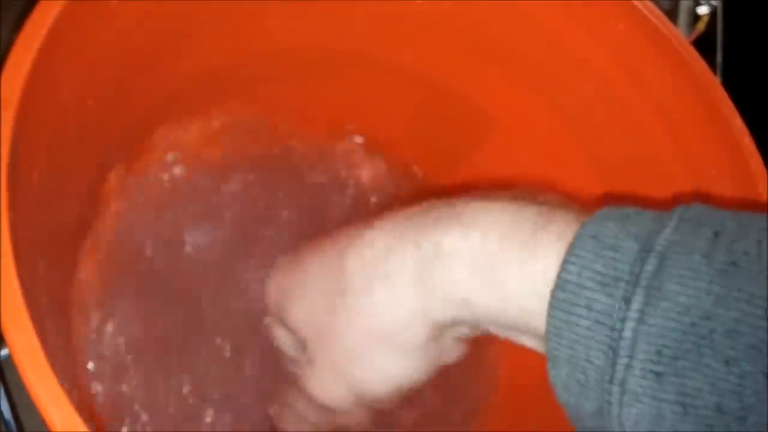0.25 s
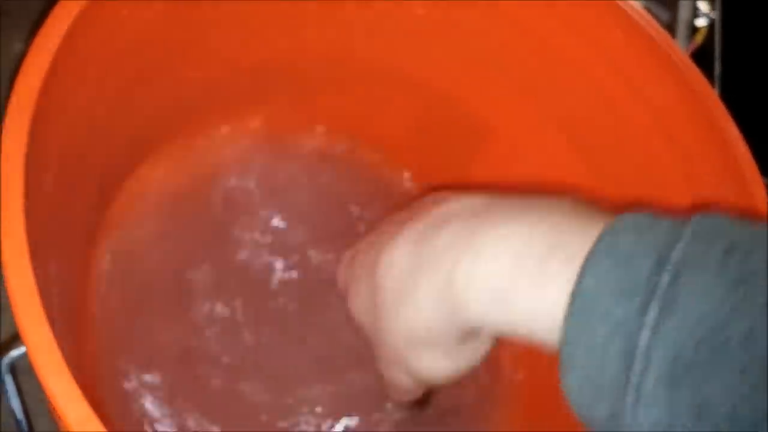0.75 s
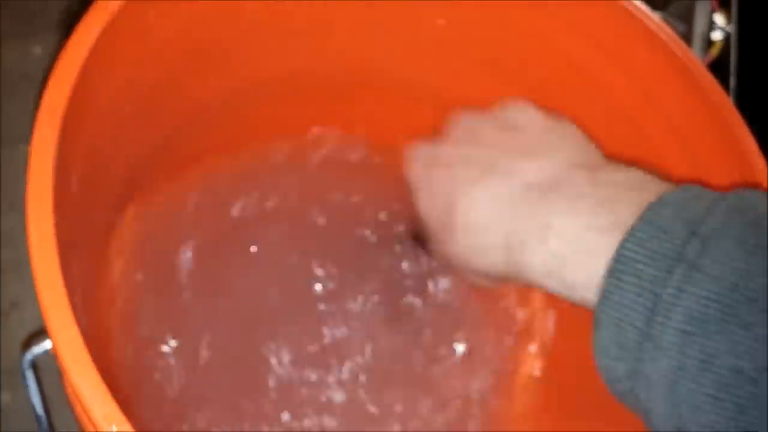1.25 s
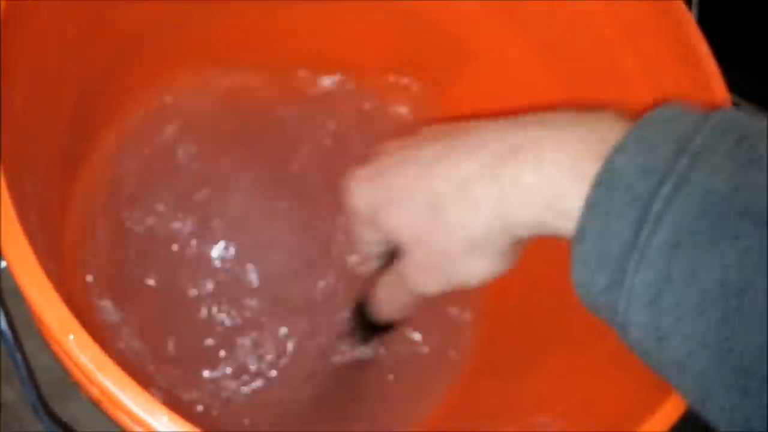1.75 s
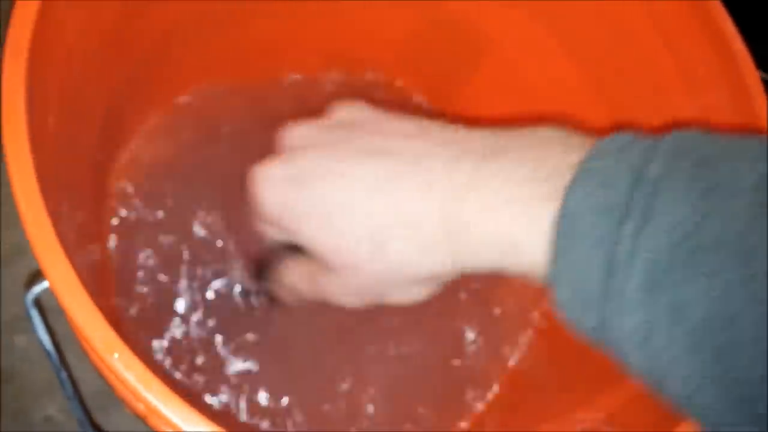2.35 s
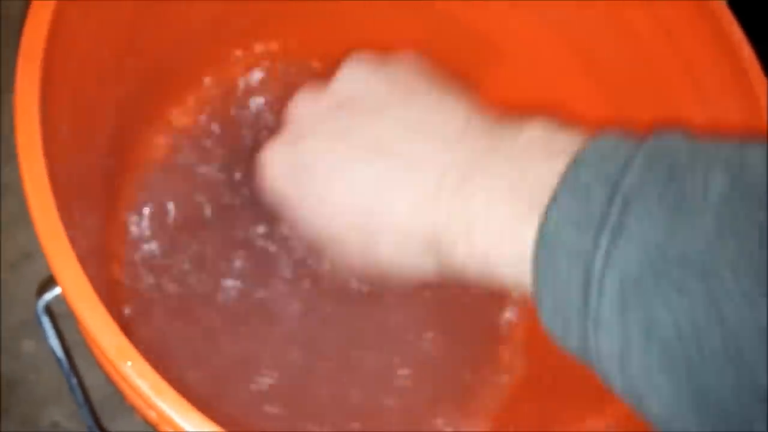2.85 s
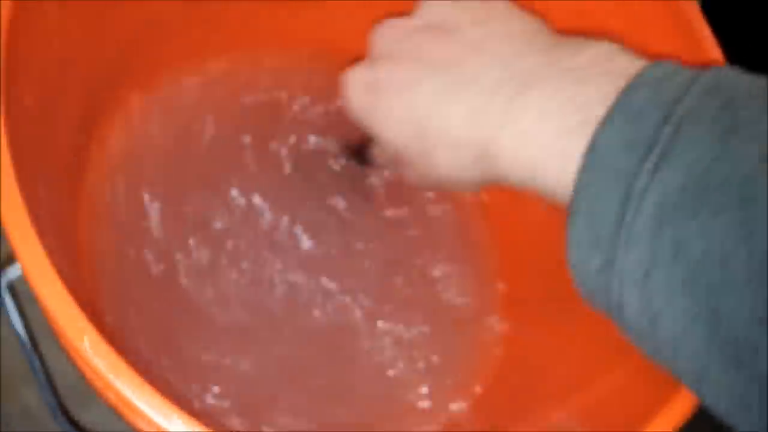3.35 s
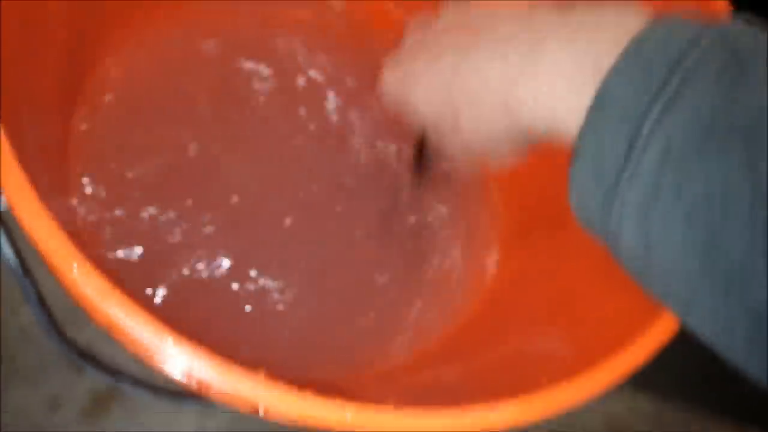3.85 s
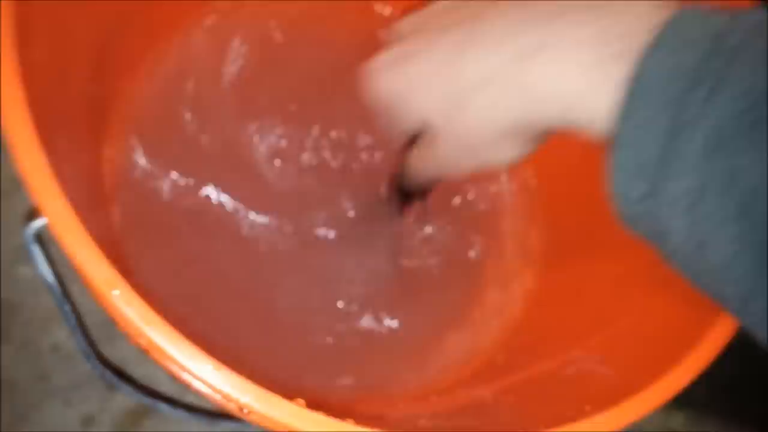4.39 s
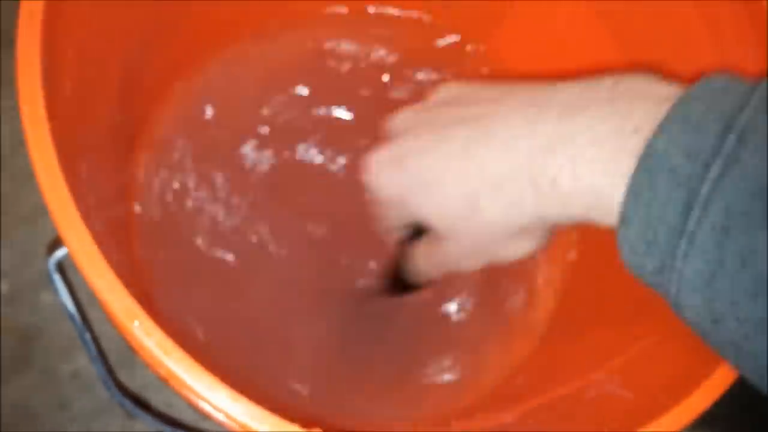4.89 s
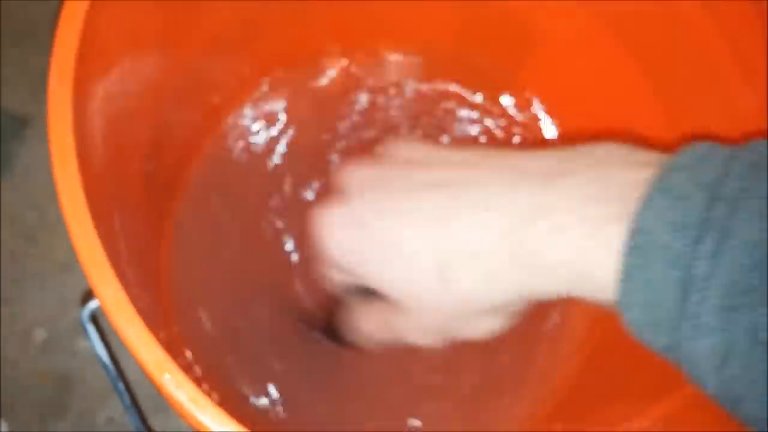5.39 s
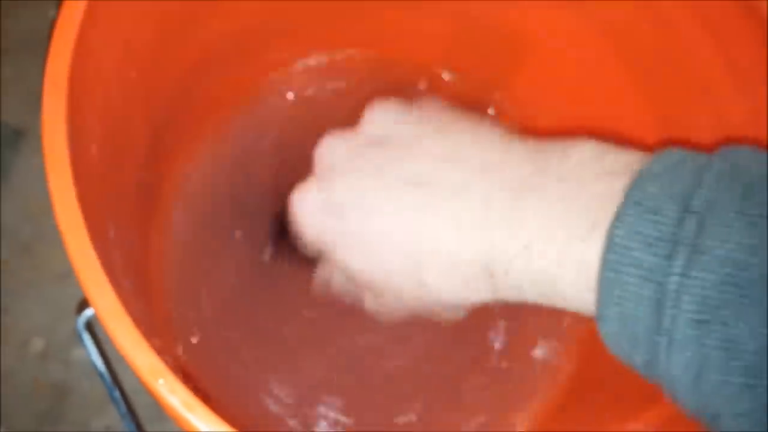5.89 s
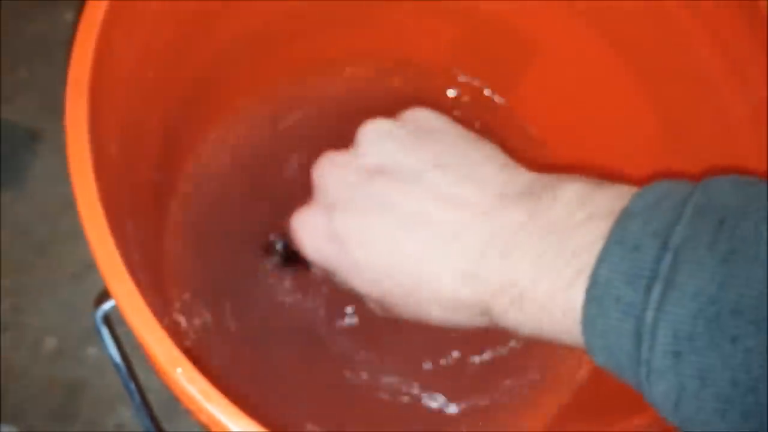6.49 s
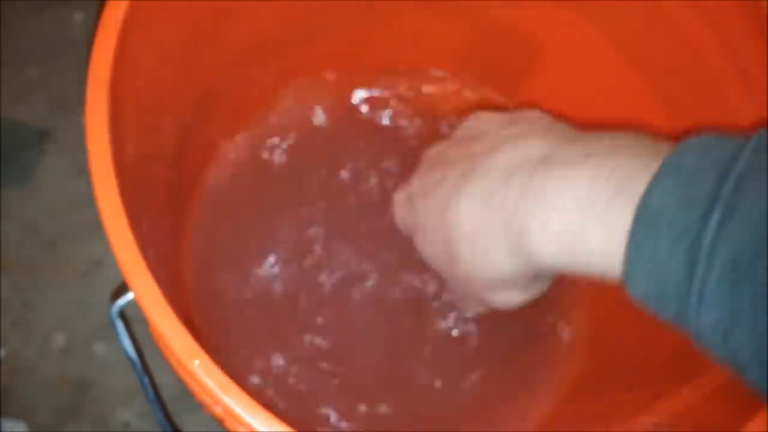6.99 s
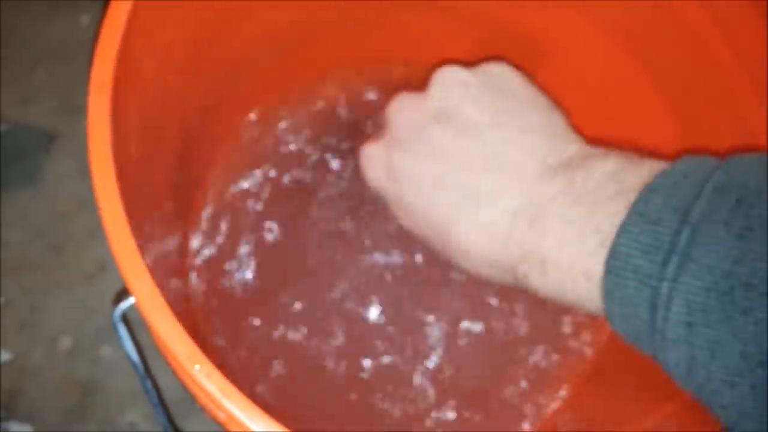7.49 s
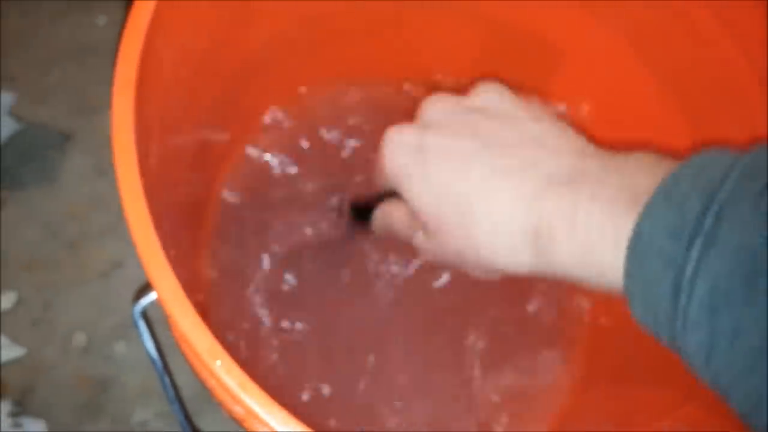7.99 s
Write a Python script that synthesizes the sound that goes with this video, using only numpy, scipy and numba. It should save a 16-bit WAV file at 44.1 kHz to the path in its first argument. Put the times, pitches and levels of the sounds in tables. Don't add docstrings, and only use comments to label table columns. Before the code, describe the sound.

Water is stirred by hand in a plastic bucket, heard very close in stereo with a hollow, boxy resonance and short wall echoes. From 0 s the sloshing is busy: deep glugs, round plops, bubbles rising slightly in pitch, crisp droplets and hissing spray. A low machine hum swells at 0.5-1 s, drops, returns faintly and vanishes by 2.4 s, leaving only weak room rumble. Plops and splashes continue in irregular surges through 2-3.4 s. A sharp bright click from a finger on the microphone body lands left at 3.5 s; a duller tap with a low thump follows at 4.3 s. Around 5-6 s the water becomes sparser and more trickling, with short dips, and almost hushes at 6.05-6.25 s. Quick bubbly plops restart at 6.35 s, then strong swirling, heavy glugs near 7 s, bright drips and spray carry on until the end at about 8.2 s.

```python
import sys
import numpy as np
from scipy import signal
from scipy.fft import rfft, irfft, next_fast_len
from scipy.io import wavfile
from scipy.ndimage import uniform_filter1d, map_coordinates
from numba import njit

SR = 44100
rng = np.random.default_rng(int(sys.argv[2]) if len(sys.argv) > 2 else 0)


def transcribe(signal):
    frames = np.atleast_2d(signal).T
    limited = np.clip(frames, -1, 1)
    pcm = np.round(limited * 32767).astype(np.int16)
    wavfile.write(sys.argv[1], SR, pcm)


def ratio_of_db(decibels):
    return 10 ** (np.asarray(decibels, float) / 20)


N = 363384

# time in seconds, level in dB.
MACHINE_DRONE = [
    (0.0, -43),
    (0.55, -30.5),
    (0.71, -34),
    (0.77, -32.5),
    (0.93, -29),
    (1.12, -59),
    (1.28, -41),
    (2.25, -51),
    (2.36, -81),
]
# frequency in Hz, level in dB per Hz.
RUMBLE_COLOUR = [(15, -70), (28, -14), (60, 14.5), (95, 14.5), (122, 17.5), (165, -8.5), (230, -11),
                 (440, -120)]
# time in seconds, click in dB, thump in dB, click brightness in Hz.
CAMERA_TAPS = [
    (3.5171, -2.5, -73, 14700),
    (4.3149, -6, -13, 3280),
]
# start in seconds, end in seconds, depth in dB.
GATE_CLOSINGS = [(2.358, 2.385, -3), (0.876, 0.96, -2.5), (3.35, 3.443, -5.5), (3.74, 3.818, -5),
                 (5.144, 5.167, -7.5), (6.732, 6.799, -7.5), (4.321, 4.414, -10), (4.814, 4.862, -8),
                 (4.935, 4.983, -8), (5.442, 5.496, -12.5), (6.051, 6.121, -18.5), (6.125, 6.163, -24),
                 (6.227, 6.256, -14)]
# frequency in Hz, width in Hz, level in dB.
AIR_COLUMN = [
    (213, 11, -4),
    (176, 14, -14),
    (282, 44, 0),
    (517, 45, -26),
    (762, 44, -1),
    (1255, 110, -3),
    (1600, 200, -5),
    (2100, 300, -9),
    (3430, 700, -12),
    (5890, 1500, -12),
]
# frequency in Hz, level in dB per Hz.
SPRAY_COLOUR = [(1410, -3), (2400, 3), (2730, 2), (3530, -6), (4250, -5.5), (5950, -1), (11000, -14),
                (15100, -21), (16400, -79)]
# time in seconds, stirring effort in dB, froth (how far fingers break the surface) in dB.
HAND = [(0.0, -20.5, -1.5), (0.96, -35, 3.5), (1.17, -20.5, 3), (1.46, -31, 3.5), (1.67, -32, -1),
        (1.86, -23, 0.5), (2.44, -29.5, 4), (2.66, -29, 4), (3.36, -31, 2), (4.64, -32, 0.5),
        (4.86, -33.5, 12.5), (5.16, -27.5, 5.5), (5.38, -36, 9), (5.8, -31.5, 5), (6.1, -38, 7),
        (6.29, -63, 30), (6.5, -23.5, -3.5), (8.24, -28.5, 7.5)]
# start in seconds, effort at the crest in dB, length in seconds.
WALL_WAVES = [
    (0.649, -20, 0.15),
    (2.538, -24.5, 0.33),
    (3.427, -25.5, 0.07),
    (3.8, -25.5, 0.25),
    (4.417, -23.5, 0.3),
    (5.584, -26, 0.26),
    (6.544, -22.5, 0.14),
    (6.796, -30, 0.73),
    (7.638, -24.5, 0.3),
]
# time in seconds, how far the trickle outweighs the spray in dB.
FINGER_DEPTH = [(0, -3.5), (1, 0), (2, 0), (3, -1), (3.6, -1), (3.9, 3.5), (4.3, 2.5), (5, 7), (5.9, 7),
                (6.6, 1), (7.3, 2.5), (8.24, 2.1)]
# dB over the effort, how steeply it follows effort, share of froth,
# wake level under its event in dB, time for the wake to fall 60 dB in seconds.
GLUG_LAYER = (-11, 2.5, -0.26, -9, .5)
BUBBLE_LAYER = (-0.5, 1.5143, 0.13, -12.5, 0.28)
TRICKLE_LAYER = (-13.5, 1.53, 0.23, -32, 0.26)
SPRAY_LAYER = (-12.5, 1.17, 1.0767, -31.5, 0.43)
# time in seconds, peak in dB, pitch in Hz.
SPLASH_TICKS = [(0.0136, -11, 2430), (0.0403, -7.5, 5150), (0.0723, -15, 6050), (0.2244, -16, 4900),
                (0.2927, -11, 5100), (0.3626, -13, 3950), (0.5703, -28, 2330), (0.6599, -28, 2990),
                (0.6802, -15, 2930), (1.0156, -18, 3150), (1.0763, -18, 5200), (1.1633, -8.5, 5200),
                (1.2305, -20, 5400), (1.488, -32, 4850), (1.5374, -18, 6230), (1.7534, -13.5, 2490),
                (1.9365, -15.5, 5030), (1.9614, -15, 5540), (1.9964, -19, 5700), (2.0647, -18.5, 5900),
                (2.1055, -13.5, 5600), (2.1385, -17, 4540), (2.251, -21, 4600), (2.3248, -17, 2700),
                (2.338, -13, 5600), (2.4354, -22, 5900), (2.5707, -13, 5930), (2.6025, -6.5, 5800),
                (2.6344, -14.5, 4320), (2.6574, -9.5, 5500), (2.6857, -17, 4430), (2.707, -24, 2880),
                (2.769, -18, 2770), (2.9492, -22, 3270), (3.8023, -25, 2830), (3.9293, -18.5, 3040),
                (4.016, -29, 3070), (4.0495, -18.5, 3380), (4.2198, -16.5, 2800), (4.4238, -19, 2730),
                (4.531, -15, 3120), (4.7765, -21, 3740), (4.9916, -21, 3900), (5.174, -27.5, 3560),
                (5.3331, -19.5, 3070), (5.4221, -25, 5160), (5.6003, -32, 3360), (5.7085, -17, 3160),
                (6.6124, -9, 2660), (6.8748, -21.5, 3650), (6.893, -17, 3630), (6.952, -16, 3010),
                (7.088, -13.5, 3250), (7.207, -13.5, 2950), (7.284, -15, 3440), (7.5682, -19, 3200),
                (7.5887, -17.5, 4150), (7.6872, -13, 3230), (7.772, -15.5, 3450), (8.099, -20, 2990),
                (0.309, -17, 5070), (1.106, -22, 4600), (1.2944, -14, 4900), (2.2179, -27, 4770),
                 (2.882, -27, 6500), (4.4944, -14, 6670), (4.016, -24, 7200), (4.1, -30, 6400),
                 (4.18, -25, 5370), (4.219, -31, 7000), (4.908, -32, 6640), (6.7141, -21.5, 6520),
                 (6.7466, -20, 6940), (7.0627, -14.5, 6760), (7.1891, -18, 5920), (7.2893, -13, 6200),
                 (7.3914, -12, 6870)]
# time in seconds, peak in dB, pitch in Hz.
SMALL_LAPS = [(0.248, -16, 1335), (0.292, -3.5, 1410), (0.331, -15, 1250), (0.52, -13.5, 2020),
              (0.542, -13, 1270), (1.104, -14.5, 1550), (1.639, -19, 716), (1.705, -14, 1800),
              (1.718, -11, 1580), (2.011, -7, 1200), (2.063, -27, 870), (2.083, -28, 820),
              (2.095, -16, 775), (2.137, -11.5, 1280), (2.39, -17, 1520), (2.71, -5, 1200),
              (2.741, -19, 810), (2.772, -16, 800), (2.803, -15.5, 1270), (2.958, -15.5, 1420),
              (3.154, -19, 1480), (3.609, -15.5, 1580), (3.808, -16, 810), (3.947, -10.5, 1320),
              (4.408, -20, 825), (4.424, -11, 1530), (4.465, -11, 1520), (4.483, -18.5, 844),
              (4.886, -22, 1540), (5.013, -13, 1460), (5.037, -18, 930), (5.143, -17.5, 800),
              (5.213, -20, 1280), (5.33, -17.5, 1490), (5.577, -18.5, 880), (5.655, -28.5, 1340),
              (6.456, -12.5, 1035), (6.532, -13.5, 1900), (6.829, -14, 1610), (6.901, -12, 805),
              (7.145, -14, 1370), (7.204, -21, 1040), (7.276, -12, 805), (7.583, -19, 1230),
              (7.667, -25, 1340), (7.686, -13, 1130), (7.889, -16, 745), (8.075, -17, 1860)]
# time in seconds, peak in dB, pitch in Hz.
HOLLOW_GULPS = [(0.019, -18, 400), (0.509, -25, 386), (0.66, -15.5, 595), (1.143, -13, 660),
                (1.229, -10.5, 660), (1.752, -17.5, 480), (2.48, -18, 600), (4.559, -19, 376),
                (6.574, -8, 520), (7.399, -17, 570), (7.739, -15.5, 550)]
# time in seconds, peak in dB, pitch in Hz.
AIR_POCKETS = [(0.029, -11, 334), (0.29, -8, 260.4), (0.524, -17.5, 267), (0.673, -6, 309),
               (1.045, -17, 279), (1.131, -15, 288), (1.163, -8, 283), (1.642, -15, 248),
               (1.751, -19.5, 276), (2.131, -16, 275), (2.493, -22, 265), (2.713, -22, 260),
               (3.118, -24, 405), (3.224, -15.5, 235), (3.463, -16.5, 297), (3.649, -20, 270),
               (5.181, -24, 282), (4.313, -17, 175), (4.485, -18.5, 306), (4.549, -15.5, 286),
               (4.618, -18.5, 256), (5.597, -18, 255), (6.458, -13.5, 293), (6.569, -8, 272),
               (6.951, -18.5, 273), (7.019, -13, 273), (7.034, -1.5, 309), (7.742, -7, 262.4),
               (7.881, -11, 308), (8.191, -13.5, 304)]
# time in seconds, peak in dB, pitch in Hz.
DROPLETS = [(0.179, -0.5, 5000), (0.249, -2, 6700), (0.482, -6.5, 4600), (0.6266, -14, 4730),
            (0.993, -8, 4240), (1.2829, -2.5, 4880), (1.317, -6, 4570), (1.39, -4, 4740), (1.507, 0, 5540),
            (1.646, -9, 5300), (1.664, 0, 5500), (1.875, -3, 5730), (2.482, -4.5, 5340),
            (2.586, -2.5, 5300), (3.047, -4, 5700), (3.4437, -15, 2830), (3.566, -14.5, 2750),
            (4.3886, -1, 2730), (4.448, -6.5, 6140), (4.478, -2.5, 3570), (5.613, -5, 3240),
            (7.0024, -1.5, 3520), (7.033, 1.5, 3460), (7.183, -3, 3150), (7.243, -7, 6300),
            (7.31, -9, 3110), (7.3818, -7.5, 3970), (7.666, -5.5, 3260), (8.146, -4.5, 3700),
            (8.2232, 3, 3460)]
# time in seconds, peak in dB, pitch in Hz.
TRICKLE_RUNS = [(6.007, -23, 3680), (6.213, -25, 4230), (6.224, -29.5, 2350), (6.262, -23.5, 2920),
                (6.278, -25.5, 7300), (6.46, -15, 4920), (6.089, -10.5, 6500), (6.3137, -14.5, 4270)]
# time in seconds, peak in dB, pitch in Hz, life in cycles, pitch rise per life.
LONG_BUBBLES = [(0.838, -24.5, 1518, 29, 0.004), (7.153, -10, 3260, 16, 0.006),
                (1.04, -22, 512, 5.8, 0.034), (1.053, -14.5, 774, 8.6, 0.085),
                (0.668, -6.5, 755, 16, 0.0017), (1.228, -6.5, 603, 6, 0.062), (1.26, -14, 635, 7, 0.03),
                (3.335, -14.5, 765, 14.5, 0.002), (6, -22, 937, 10, 0.0012),
                (6.162, -31.5, 2170, 13, 0.001), (6.567, -4.5, 506, 6.8, 0.037),
                (7.42, -19, 336, 5.1, 0.009), (7.969, -16.5, 568.5, 14, 0.17)]
# time in seconds, peak in dB, pitch in Hz, thrown water in dB under the peak.
LARGE_PLOPS = [(0.073, 3.5, 750, -18), (0.659, -3.5, 734, -19), (0.995, -14.5, 840, 1.5),
               (1.145, -11.5, 718, -22), (1.232, -3, 670, -27), (1.265, -5.5, 708, -37),
               (1.639, -8, 744, -2.5), (1.754, 0, 707, -6), (2.481, -0.5, 735, -4.5),
               (3.121, -11, 728, 3.5), (3.442, -2.5, 757, -6), (3.817, -8, 763, -6), (4.391, -3, 910, -35),
               (6.806, -9.5, 730, -89), (6.874, -10, 876, -32), (7.308, 2.5, 762, -31),
               (7.741, -10.5, 675, 6), (8.114, -8, 830, -1.5)]
MIDDLING_PLOPS = [(0.291, -27, 1395, -23), (0.423, -5.5, 1390, -24), (1.283, -3.5, 1280, -20),
                  (1.304, -8, 1320, -36), (1.39, -9, 1370, -4.5), (1.893, -5, 1390, 4.5),
                  (2.022, -16, 1120, -32), (2.119, -4, 1160, -19), (2.634, -4, 1250, -16),
                  (2.709, -11, 1260, 6), (3.034, -5, 1026, -41), (3.643, -2.5, 1210, -9),
                  (3.931, -17, 1370, 6.5), (4.017, -7, 1160, -11), (4.218, -6, 1324, -21),
                  (4.569, -7.5, 1130, -40), (4.776, -8, 1290, -17), (5.102, -10.5, 1290, -19),
                  (5.17, -1.5, 1230, -18), (5.497, -11, 1260, -34.5), (5.708, -22, 1180, -4),
                  (6.282, -25.5, 1380, -18), (6.676, -7, 1350, -35), (6.949, -7.5, 1110, -4),
                  (6.99, -1.5, 1400, -2.5), (8.173, -8.5, 1120, 6.5), (8.199, -5, 1230, 2)]
SMALL_PLOPS = [(0.032, -2, 2050, -3), (0.335, -2, 1950, -11), (0.363, -4.5, 1880, -3),
               (0.567, -11, 1840, 1.5), (0.834, -12, 1450, -4), (0.963, -22, 2130, -4),
               (1.025, -5, 1730, -2), (1.356, -14.5, 1670, 1.5), (1.488, -12, 1710, -29),
               (1.949, -5, 1970, -7), (2.468, -4, 1970, -31), (2.584, -7, 1630, 5.5),
               (2.987, -8.5, 1990, -63), (3.216, -7.5, 1470, -1), (3.512, -13, 1510, -41),
               (4.531, 4.5, 1410, -40), (4.901, -12.5, 1450, -22), (5.733, -0.5, 1660, -17),
               (5.895, -14.5, 1580, -5.5), (6.35, -6.5, 1830, -11), (6.372, -1, 1730, -34),
               (6.403, -1, 1750, -18), (6.49, 0.5, 1780, -46), (6.557, -6, 1850, -6), (7.035, -11, 1430, 2),
               (7.605, -7, 1480, -3.5), (7.954, -9.5, 1670, -36)]


def unit(x):
    return x / np.sqrt(np.mean(x ** 2) + 1e-20)


def curves(rows):
    s, *columns = np.transpose(rows)
    return [np.interp(np.arange(N) / SR, s, column) for column in columns]


def wobble(rate):
    knots = rng.standard_normal(int(N * rate / SR) + 4)
    return map_coordinates(knots, [np.arange(N) * rate / SR])


def filtered(x, response):
    size = next_fast_len(x.shape[-1] + 8192)
    spectrum = rfft(x, size) * response(np.fft.rfftfreq(size, 1 / SR))
    return irfft(spectrum, size)[..., :x.shape[-1]]


def colour(points):
    f, db = np.transpose(points)
    return lambda hz: ratio_of_db(np.interp(np.log(hz + 1), np.log(f), db))


def workshop():
    t = np.arange(N) / SR
    cycles = 88 * t + np.cumsum(0.92 * wobble(7.1)) / SR
    drone_db = curves(MACHINE_DRONE)[0] - 1.5 + 2.9 * wobble(14)
    drone = np.sin(2 * np.pi * cycles) * ratio_of_db(drone_db)
    mains = ratio_of_db(-54.5 + 1.2 * wobble(6.2)) * np.sin(2 * np.pi * 119 * t)
    air = rng.standard_normal(N) + 0.4 * rng.standard_normal((2, N))
    rumble = ratio_of_db(-51.5 + 0.6 * wobble(3.3)) * unit(filtered(air, colour(RUMBLE_COLOUR)))
    return (drone + mains + rumble) * ratio_of_db([[2.4], [-2.4]])


def taps():
    out, t = np.zeros(N + SR), np.arange(SR // 8) / SR
    for s, click_db, thump_db, bright_hz in CAMERA_TAPS:
        def click_tone(f):
            low_cut = 1j * f / (bright_hz / 5 + 1j * f)
            return 1 / (1 + 1j * f / bright_hz) ** 4 * low_cut

        click = filtered(ratio_of_db(-60 * t / 0.002) * rng.standard_normal(len(t)), click_tone)
        falling_pitch = 75 * t * (1 + np.exp(-t / 0.016))
        thump = ratio_of_db(thump_db - 60 * t / 0.06) * np.cos(2 * np.pi * falling_pitch)
        out[round(s * SR):][:len(t)] += ratio_of_db(click_db) * click / np.abs(click).max() + thump
    return out[:N] * ratio_of_db([[4], [-16]])


def gate():
    db = np.zeros(N)
    for start, end, depth_db in GATE_CLOSINGS:
        db[round(start * SR):round(end * SR)] = depth_db
    return ratio_of_db(uniform_filter1d(db, size=300))


def bucket(f):
    modes = 0
    for k, (centre, width, db) in enumerate(AIR_COLUMN):
        damping = 1j * f * width
        mode = damping / (centre * centre - f * f + damping)
        modes = modes + (-1) ** k * ratio_of_db(db) * mode
    return modes + ratio_of_db(-70.0)


def hollow(f):
    dip = 1 - 0.43 / (1 + ((f - 520) / 130) ** 2)
    return dip / (1 + (120 / (f + 1)) ** 4)


def walls(x):
    t = np.arange(SR // 8) / SR
    tail = rng.standard_normal((2, len(t))) * ratio_of_db(-60 * t / 0.22) * (t > .001)
    echoes = signal.fftconvolve(x, tail / np.linalg.norm(tail[0]), axes=1)[:, :N]
    middle = lambda f: f ** 2 / (f ** 2 + 900 ** 2) / (1 + (f / 4500) ** 2)
    return x + ratio_of_db(-2.5) * filtered(echoes, middle)


def bursts(events, over_db, rise_s, fall_s, sharp, broad_db, pan_db, alike):
    s, db, hz = np.transpose(events)
    t = np.arange(2048) / SR - .008
    f = np.fft.rfftfreq(len(t), 1 / SR) / hz[:, None, None]
    z = rng.standard_normal((len(s), 3, len(t)))
    noise = alike * z[:, :1] + z[:, 1:]
    peak = 1 / (1 + (sharp * (f - 1)) ** 2)
    skirt = ratio_of_db(broad_db) * f / (1 + f ** 2.35)
    tone = irfft(rfft(noise) * (peak + skirt), len(t))
    puff = tone * np.exp(-(t / np.where(t < 0, rise_s, fall_s)) ** 2 / 2)
    puff = puff / np.abs(puff).max(axis=2, keepdims=True)
    puff = puff * ratio_of_db(db[:, None, None] + over_db + pan_db / 2 * np.array([[1], [-1]]))
    at = np.round((s[:, None] + t + rise_s) * SR).astype(int).clip(0, N - 1).ravel()
    return np.array([np.bincount(at, puff[:, ch].ravel(), N) for ch in range(2)])


def ticking():
    events = np.array(SPLASH_TICKS)
    return bursts(events, over_db=-1, rise_s=.0017, fall_s=.0026, sharp=11, broad_db=-22, pan_db=7, alike=.3)


def lapping():
    laps = bursts(SMALL_LAPS, over_db=-3.5, rise_s=0.00255, fall_s=0.0073, sharp=12.0, broad_db=-33.0,
                  pan_db=8.5, alike=0.81)
    gulps = bursts(HOLLOW_GULPS, over_db=-1.0, rise_s=.003, fall_s=0.027, sharp=4.3, broad_db=-2.0,
                   pan_db=4, alike=1.2)
    return laps + gulps


@njit
def ring(rows, n, sr, rise, onset):
    out = np.zeros((2, n))
    for s, hz, cycles, left, right, lag in zip(rows[0], rows[1], rows[2], rows[3], rows[4], rows[5]):
        start, life = int(s * sr), cycles / hz
        for i in range(max(0, min(int((4 * life + .001) * sr), n - start))):
            for ch in range(2):
                t = i / sr - max(0., lag if ch else -lag)
                if t > 0:
                    u = t / life
                    tone = np.sin(2 * np.pi * hz * t * (1 + rise * u))
                    v = tone * np.exp(-u) * (1 - np.exp(-onset * u)) ** 2 * 2
                    out[ch, start + i] += v * (right if ch else left)
    return out


def place(s, hz, cycles, db, pan_db, rise):
    lag = 0.00015 * rng.standard_normal(len(s))
    rows = np.array([s, hz, cycles, ratio_of_db(db + pan_db / 2), ratio_of_db(db - pan_db / 2), lag])
    return ring(rows, N, SR, rise, 2.22)


def cluster(s, hz, cycles, db, pan_db, rise, spread, within, count):
    z, u = rng.standard_normal((len(s), count)), rng.random((len(s), count))
    follower = np.arange(count) > 0
    times = s[:, None] + within * u * follower
    pitch = hz[:, None] * np.exp(spread * np.abs(z) * follower)
    levels = db[:, None] - follower * (5 + 9 * u)
    life = np.full(times.size, cycles)
    return place(times.ravel(), pitch.ravel(), life, levels.ravel(), np.repeat(pan_db, count), rise)


def splash(s, db, pan_db, t60, alike, response, swell_s=0.00044):
    t = np.arange(SR // 6) / SR
    shape = ratio_of_db(-60 * t / t60) * (1 - np.exp(-t / swell_s))
    out = np.zeros((2, N + len(t)))
    for start, level, pan in zip(s, db, pan_db):
        burst = (alike * rng.standard_normal(len(t)) + rng.standard_normal((2, len(t)))) * shape
        out[:, round(start * SR):][:, :len(t)] += burst * ratio_of_db(level + np.array([[pan / 2], [-pan / 2]]))
    return filtered(out[:, :N], response)


def slaps(s, db, pan, small):
    def body(low_hz):
        return lambda f: bucket(f) * (f / (f + low_hz)) ** 2 / (1 + (f / 2400) ** 4)

    big = len(LARGE_PLOPS)
    deep = splash(s[:big], db[:big] + 4.5, pan[:big], t60=0.039, alike=2.3, response=body(low_hz=149))
    light = splash(s[big:], db[big:] + 6.5 - 9 * small[big:], pan[big:], t60=0.045, alike=2.7,
                   response=body(low_hz=696), swell_s=0.0031)
    contact = splash(s, db + 0.5 - 15 * small, pan, t60=0.013, alike=2.5,
                     response=lambda f: bucket(f) / (1 + (f / 4500) ** 2), swell_s=0.0012)
    return deep + light + contact


def droplets():
    events = np.vstack([DROPLETS, TRICKLE_RUNS])
    s, db, hz = np.transpose(events)
    drop = cluster(s, hz, 4.5, db - 6.5, np.full(len(s), 8.), rise=0.028, spread=0.13, within=0.012, count=5)
    spit = bursts(events, over_db=-8.0, rise_s=0.0022, fall_s=0.0022, sharp=4.3, broad_db=-13,
                  pan_db=8, alike=0.23)
    return drop + spit


def gurgles():
    out = np.zeros((2, N))
    for s, db, hz, cycles, rise in LONG_BUBBLES:
        out += place(*np.array([[s], [hz], [cycles], [db], [5.]]), rise=rise)
    return out


def plops():
    s, db, hz, thrown_db = np.transpose(np.vstack([LARGE_PLOPS, MIDDLING_PLOPS, SMALL_PLOPS]))
    pan = np.minimum(4.5 - 0.5 * db, 7) + 2.5 * rng.standard_normal(len(s))
    small = np.arange(len(s)) >= len(LARGE_PLOPS) + len(MIDDLING_PLOPS)
    bubble = cluster(s, hz, 3.4, db + 3 * small, pan, rise=0.01, spread=0.169, within=0.014, count=4)
    slap = slaps(s, db, pan, small)
    thrown = splash(s, db + thrown_db + 1.5, pan, t60=0.063, alike=0.11,
                    response=lambda f: colour(SPRAY_COLOUR)(f) ** 1.26, swell_s=0.0095)
    s, db, hz = np.transpose(AIR_POCKETS)
    pocket = cluster(s, hz, 3.2, db + 5, np.full(len(s), 4.), rise=0.003, spread=0.12, within=0.03, count=3)
    ringing = 0.61 * bubble + 0.69 * pocket + 0.28 * filtered(bubble + pocket, bucket)
    return ringing + slap + thrown + droplets() + gurgles()


def effort_db():
    t = np.arange(N) / SR
    power = ratio_of_db(2 * curves(HAND)[0])
    for s, db, length in WALL_WAVES:
        crest = np.sin(np.pi * np.clip((t - s) / length, 0, 1) ** 0.55) ** 2
        power = power + ratio_of_db(2 * db) * crest
    return 10 * np.log10(power)


def wake(events, under_db, t60):
    t, blows = np.arange(SR) / SR, np.zeros(N)
    at = np.round(events[:, 0] * SR).astype(int)
    np.add.at(blows, at, ratio_of_db(2 * (events[:, 1] + under_db)))
    shape = ratio_of_db(-120 * t / t60) * (1 - np.exp(-t / 0.007))
    return np.abs(signal.fftconvolve(blows, shape)[:N])


def level_db(layer, *tables):
    over_db, steep, share, under_db, t60 = layer
    events = np.vstack([np.array(table)[:, :2] for table in tables])
    effort, froth_db = effort_db(), curves(HAND)[1]
    steady_db = effort.mean() + over_db + steep * (effort - effort.mean()) + share * froth_db
    return 10 * np.log10(ratio_of_db(2 * steady_db) + wake(events, under_db, t60))


def swarm(count, hz, octaves, cycles, uneven_db, pan_db, clump_db, rise=0.0045):
    z, u = rng.standard_normal((count, 3)), rng.random((count, 2))
    s = u[:, 0] * N / SR
    db = -uneven_db * np.log(u[:, 1] + 0.0011) + clump_db * wobble(22)[(s * SR).astype(int)]
    pitch = np.clip(hz * 2 ** (octaves * z[:, 0]), 100, 11500)
    life = cycles * np.exp(0.604 * np.minimum(z[:, 1], 1))
    return place(s, pitch, life, db, pan_db + 3 * z[:, 2], rise)


def turbulence(alike):
    return np.sqrt(alike) * rng.standard_normal(N) + np.sqrt(1 - alike) * rng.standard_normal((2, N))


def patchy(x, depth_db):
    z = signal.stft(x, nperseg=512)[2]
    field = uniform_filter1d(rng.standard_normal(z.shape[1:]), size=5, axis=0)
    field = uniform_filter1d(field, size=4, axis=1)
    return signal.istft(z * ratio_of_db(depth_db * unit(field)), nperseg=512)[1][:, :N]


def glugging():
    glug = swarm(count=1600, hz=274.3, octaves=0.346, cycles=1.7, uneven_db=2.0, pan_db=6.5, clump_db=4.5)
    glug = unit(glug) + ratio_of_db(13.5) * turbulence(1.0) * ratio_of_db(3 * wobble(20))
    return unit(filtered(glug, lambda f: bucket(f) / (1 + (f / 420) ** 6)))


def bubbling():
    bubbles = swarm(count=4500, hz=1250, octaves=0.538, cycles=4.6, uneven_db=2.6, pan_db=7.5,
                    clump_db=3.5, rise=.015)
    bubbles = unit(bubbles) + ratio_of_db(-38.5) * turbulence(0.1) * ratio_of_db(0.51 * wobble(27))
    return unit(filtered(bubbles, bucket))


def trickling():
    trickle = swarm(count=5000, hz=2900, octaves=.36, cycles=4.8, uneven_db=2.4, pan_db=6,
                    clump_db=3.5, rise=.02)
    rush = turbulence(0.14) * ratio_of_db(1.4 * wobble(40))
    rush = filtered(rush, lambda f: 1 / (1 + (1800 / (f + 1)) ** 4))
    trickle = unit(trickle) + ratio_of_db(-8.5) * rush
    return unit(filtered(trickle, lambda f: bucket(f) / (1 + (f / 4300) ** 8)))


def spraying():
    fizz = swarm(count=12000, hz=5800, octaves=.42, cycles=4.5, uneven_db=2.5, pan_db=10, clump_db=4)
    fizz = unit(filtered(fizz, lambda f: colour(SPRAY_COLOUR)(f) ** 0.6))
    hiss = patchy(turbulence(.02), depth_db=2.5) * ratio_of_db([[2], [-2]]) * ratio_of_db(2 * wobble(40))
    hiss = unit(filtered(hiss, colour(SPRAY_COLOUR)))
    return unit(fizz + ratio_of_db(1.5) * hiss)


def churn():
    depth_db, = curves(FINGER_DEPTH)
    glug_db = level_db(GLUG_LAYER, AIR_POCKETS) - 5.5
    bubble_db = level_db(BUBBLE_LAYER, LARGE_PLOPS, MIDDLING_PLOPS) - 2.0
    trickle_db = level_db(TRICKLE_LAYER, MIDDLING_PLOPS, SMALL_PLOPS) + depth_db - 0.5
    spray_db = level_db(SPRAY_LAYER, DROPLETS) - depth_db + 1.5
    low = ratio_of_db(glug_db) * glugging() + ratio_of_db(bubble_db) * bubbling()
    high = ratio_of_db(trickle_db) * trickling() + ratio_of_db(spray_db) * spraying()
    return low + high


def scene():
    shut = gate()
    water = filtered(churn() + plops(), hollow) + lapping()
    water = walls(water) + ticking()
    return water * shut + taps() + workshop() * shut ** 0.63


def low_pass(x):
    return signal.sosfilt(signal.butter(12, 16660, fs=SR, output="sos"), x)


def record(dry):
    dull = filtered(dry, lambda f: 1 / (1 + (f / 16200) ** 30))
    soft = dull / (1 + np.abs(dull / .97) ** 6) ** (1 / 6)
    return low_pass(soft)


dry = scene()
out = record(dry)
transcribe(out)
```